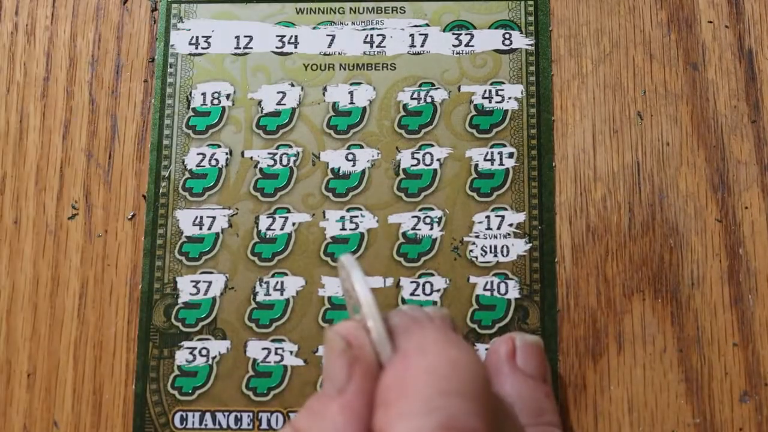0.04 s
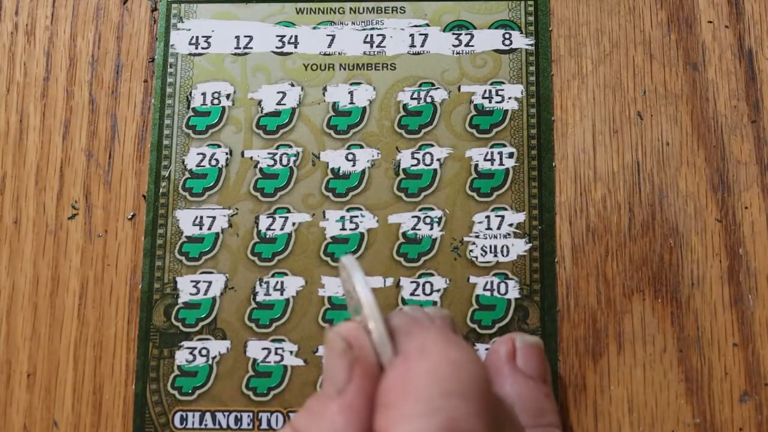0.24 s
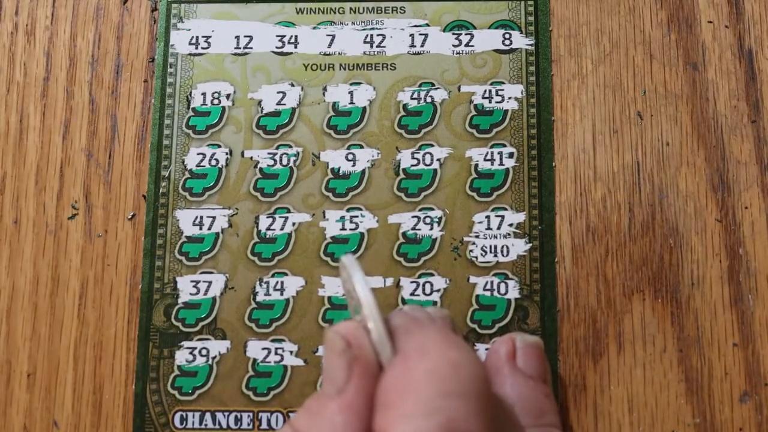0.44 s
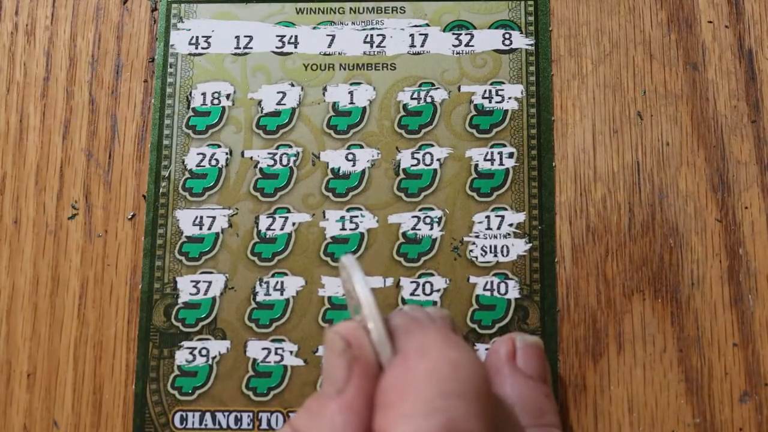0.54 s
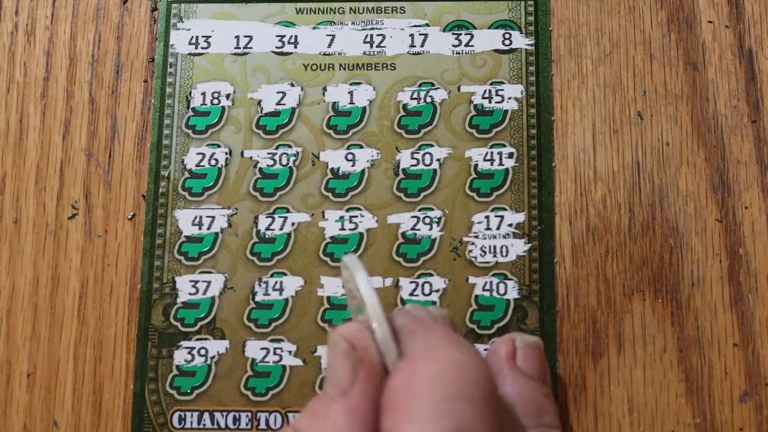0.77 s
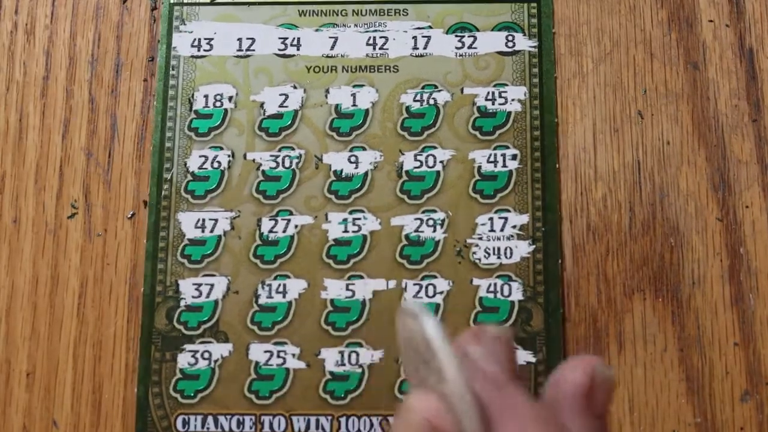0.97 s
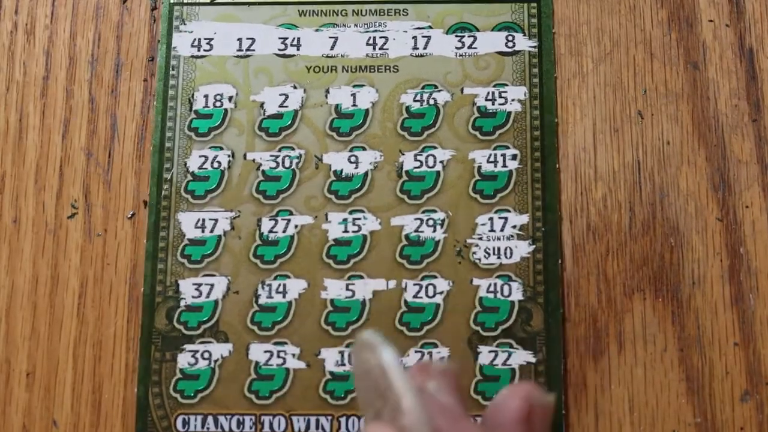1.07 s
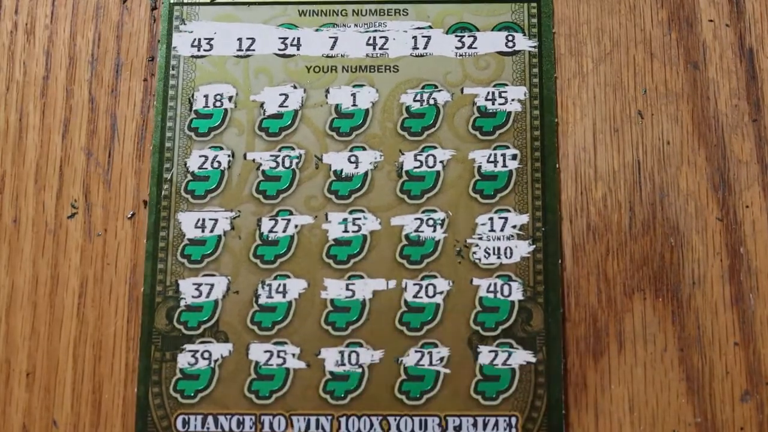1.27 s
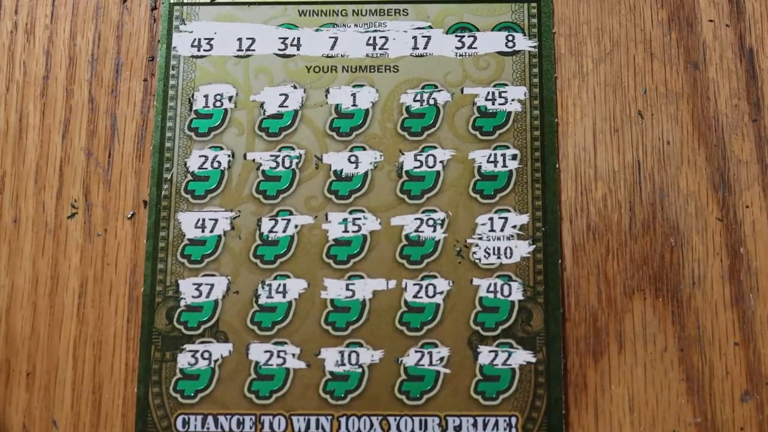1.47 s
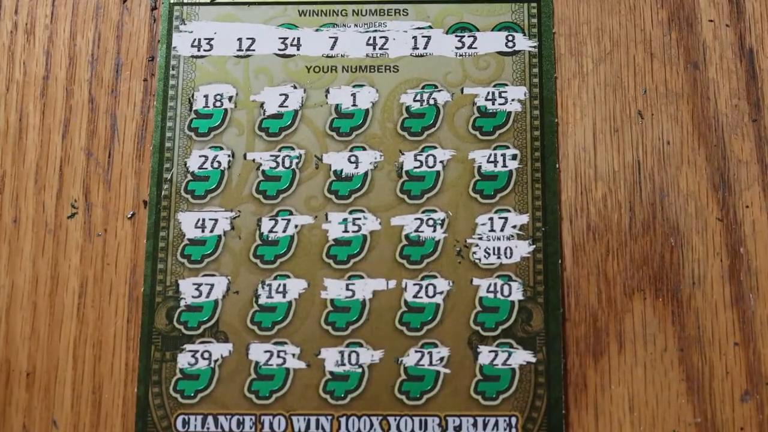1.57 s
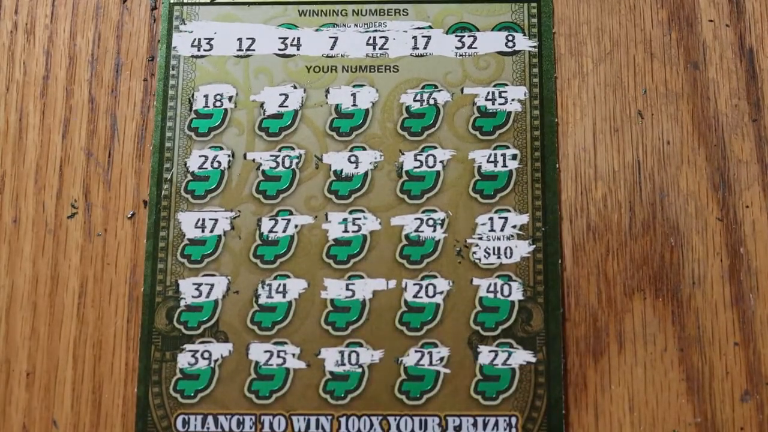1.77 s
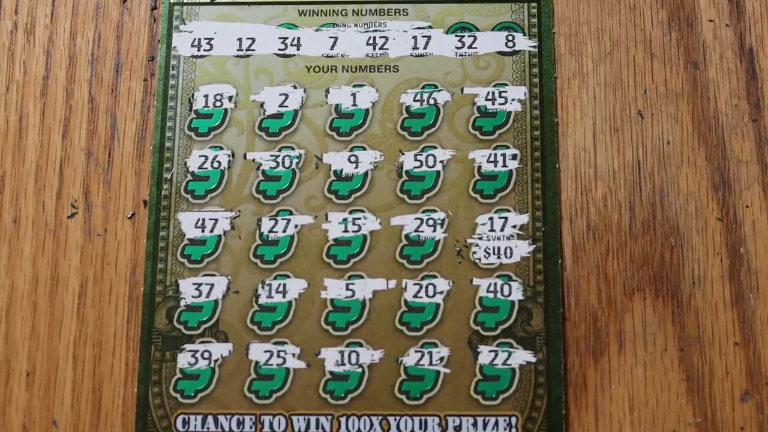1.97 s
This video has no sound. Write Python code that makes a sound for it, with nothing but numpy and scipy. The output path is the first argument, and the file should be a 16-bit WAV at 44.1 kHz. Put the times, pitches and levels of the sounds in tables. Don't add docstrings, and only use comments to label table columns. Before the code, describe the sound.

A heavy metal coin rings like a small bell, knocks sharply on a wooden table, rings again

```python
import sys
import numpy as np
from scipy import signal
from scipy.fft import rfft, irfft, next_fast_len
from scipy.io import wavfile
from scipy.ndimage import uniform_filter1d, map_coordinates

SR = 44100
rng = np.random.default_rng(int(sys.argv[2]) if len(sys.argv) > 2 else 0)


def level_to_linear(level):
    exponent = np.asarray(level, float) / 20
    return 10 ** exponent


def waveform_to_disk(signal):
    frames = np.transpose(np.atleast_2d(signal))
    scaled = np.clip(frames, -1, 1) * 32767
    samples = np.round(scaled).astype(np.int16)
    wavfile.write(sys.argv[1], SR, samples)


N = 88685


def unit(x):
    return x / np.sqrt(np.mean(x ** 2) + 1e-20)


def along(points, hz):
    f, v = np.transpose(points)
    return np.interp(np.log(hz + 1), np.log(f + 1), v)


def over_time(points):
    return np.interp(np.arange(N) / SR, *np.transpose(points))


def wobble(rate):
    knots = rng.standard_normal(int(N * rate / SR) + 4)
    return map_coordinates(knots, [np.arange(N) * rate / SR])


def filtered(x, response):
    m = next_fast_len(N + SR // 2)
    return irfft(rfft(x, m) * response(np.fft.rfftfreq(m, 1 / SR)), m)[..., :N]


def highpass(hz, power):
    return lambda f: 1 / (1 + (hz / (f + 1)) ** power)


def bursts(rows, colour):
    t = np.arange(N) / SR
    noise = unit(filtered(rng.standard_normal(N), colour))
    return noise * sum((t >= s) * level_to_linear(db - 60 * np.abs(t - s) / t60) for s, db, t60 in rows)


def tone(t, hz, fade_db, left_db, right_db, lead, turn):
    level_db = np.array([[left_db], [right_db]]) - fade_db * t
    phase = 2 * np.pi * hz * t + turn - lead * np.array([[0], [1]])
    return level_to_linear(level_db) * np.cos(phase)


# (time [s], level [dB])
TURN = [(0, 3), (.6, 0.5), (0.732, 3), (.765, -1), (.8, 1), (.87, 1), (1.001, 4), (1.04, -0.5), (1.101, -2),
        (1.138, -1.5), (1.19, 3.5), (1.246, 3), (1.319, 7), (1.355, 4.5), (1.39, 10.5), (1.446, -1.5),
        (1.52, 7.5), (2.01, -3)]
TURN_RIGHT = 0.23
# (time [s], second mode left [dB], second mode right [dB], third mode [dB],
# fourth mode right [dB])
TILT = [(0.0, 0.5, 2.5, 4.5, 3), (0.1, -0.5, 2.0, -0.5, -1), (0.25, -0.5, -0.5, 0.4, 1.5),
        (0.451, -1.0, -2.0, 0, 0.5), (0.56, -0.5, -2, 2.5, -0.5), (0.66, -0.5, 3, 1, 2),
        (0.78, -2, -1, -0.5, 1.5), (0.9, 2, -1, 1.5, 0.5), (1.039, -2.5, 2.5, -2, -0.5), (1.14, 0, 0, 2, 2),
        (1.27, -1, -0.5, 0.5, 1.0), (1.36, 2.0, 5, 1.5, 0.0), (1.45, -2.0, -3, 4, -6.5),
        (1.56, -2, 0.5, 3, 0.0), (1.659, 1.5, -1, 4.5, -1), (1.77, 3.0, 2.5, -0.5, -2.0),
        (1.899, -0.5, -3.5, 3.7, 1.5), (2.0, 1.5, -7.5, 3, -1)]


def lobes():
    t = np.arange(N) / SR
    s, *columns = np.transpose(TILT)
    left, right, third, fourth_right = [np.interp(t, s, c) for c in columns]
    out = np.zeros((len(TWINS), 2, N))
    out[1] = [left, right]
    out[2] = third
    out[3] = over_time(TURN) * np.array([[1], [TURN_RIGHT]]) + [0 * t, fourth_right]
    return out


STRIKE_S = [
    0,
    .572,
]
# (low twin [Hz], split [Hz], low twin fade [dB/s], high twin fade [dB/s])
TWINS = [(913.38, 2.03, 5.5, 7.8), (2403.66, 2.96, 8, 11.6), (4442.73, 3.68, 17.6, 20.5),
         (6982.68, 1.66, 38, 26.5), (9977.35, 6.4, 98, 96), (13396.36, 5.68, 169, 163)]
RING_DB = [.5, 3.5, 4, 3.5, 5.5, 5.5]
SWELL_S = [
    [.1215, .282, .177, .194, .144, .0165],
    [.339, .0065, .144, .121, .088, .096],
]
# (left [dB], right [dB], left leads [rad])
FIRST_STRIKE = [(-44, -43, 2.81), (-46, -38, 1.38), (-19, -24.4, -.84), (-26.5, -39, -1.73),
                (-30, -34, 2.73), (-12.2, -14.3, 2.4), (-17, -14, 1.74), (-30, -31.4, 1.02),
                (-16.4, -14, 2.83), (-6.4, -7, 2.92), (-21, -25, 3.12), (-15, -12, -2.85)]
# (left [dB], right [dB], left leads [rad])
SECOND_STRIKE = [(-44.6, -38.6, -2.31), (-40.5, -35.3, .17), (-25.3, -29, .85), (-29, -36, -.73),
                 (-24.4, -28.4, 2.56), (-17.8, -20.2, 2.48), (-12.4, -13.5, 1.6), (-30, -29.4, 1.08),
                 (-11.5, -9, 2.82), (4.3, 2.8, 2.9), (-19.7, -17.6, -2.42), (-4.4, -2.6, -2.86)]
SINGLE_HZ = [1826.9, 3317.2, 3420, 9386.5, 3003, 6562, 7278, 8398, 3800, 5360, 6069, 7896, 8420, 11428,
             5560, 1180, 8065]
# (fade [dB/s], first strike [dB], second strike [dB], left minus right [dB])
SINGLES = [(11, -48, -49, 6.5), (17, -43, -49, 7), (330, -20, 4.5, -4), (130, -29, -46, 3),
           (240, -25, -8, -3), (300, -35, -10, 0), (1200, -30, -8, 0), (700, -20, -3, 0),
           (1200, -35, -4, 0), (15, -68, -66, 0), (25, -58, -60, 0), (30, -58, -66, 0), (20, -64, -60, 0),
           (35, -60, -72, 3), (260, -40, -22, 0), (1300, -40, -3, 2), (500, -30, -16, 0)]
# (frequency [Hz], left leads [rad])
SINGLE_LEADS = [(1200, .8), (1800, 1.36), (3000, 2.6), (3317.2, -1.45), (3420, 2.1), (6500, 2.2),
                (9400, 4.5)]
FLUTTER_DB, FLUTTER_HZ = 7, 5000
RISE_S = .002


def disc():
    out = np.zeros((2, N))
    edges = [round(s * SR) for s in STRIKE_S] + [N]
    lobes_db = lobes()
    for k, rows in enumerate([FIRST_STRIKE, SECOND_STRIKE]):
        a, b = edges[k:k + 2]
        t = np.arange(b - a) / SR
        for m, (hz, split, low_fade, high_fade) in enumerate(TWINS):
            turn = rng.uniform(0, 2 * np.pi)
            high_turn = turn - 2 * np.pi * split * SWELL_S[k][m]
            low = tone(t, hz, low_fade, *rows[2 * m], turn)
            high = tone(t, hz + split, high_fade, *rows[2 * m + 1], high_turn)
            out[:, a:b] += level_to_linear(RING_DB[m] + lobes_db[m, :, a:b]) * (low + high)
        for hz, (fade, *strike_db, pan) in zip(SINGLE_HZ, SINGLES):
            depth = np.minimum(1, 100 / fade) * (1 if hz > FLUTTER_HZ else .3)
            flutter_db = FLUTTER_DB * depth * wobble(25)[a:b]
            left_db, right_db = strike_db[k] + pan / 2, strike_db[k] - pan / 2
            lead, turn = along(SINGLE_LEADS, hz), rng.uniform(0, 2 * np.pi)
            out[:, a:b] += level_to_linear(flutter_db) * tone(t, hz, fade, left_db, right_db, lead, turn)
        out[:, a:b] *= 1 - k * np.exp(-t / RISE_S)
    return out


def graze():
    start_s, hz, level_db, t60_s = .5605, 11400, -25, .04
    t = np.maximum(np.arange(N) / SR - start_s, 0)
    sine = level_to_linear(level_db - 60 * t / t60_s) * np.sin(2 * np.pi * hz * t)
    return sine * np.array([[1], [-1]])


# (frequency [Hz], width [Hz], level [dB])
WOOD = [(97, 35, 0.5), (202, 130, -8), (345, 130, 2), (490, 130, 3), (720, 260, 1.5), (1073, 390, 1),
        (2480, 180, -19)]


def wood(f):
    total = 0
    for k, (centre, width, db) in enumerate(WOOD):
        damping = 1j * f * width
        total = total + (-1) ** k * level_to_linear(db) * damping / (centre ** 2 - f ** 2 + damping)
    return total


# (time [s], level [dB], t60 [s])
BLOWS = [
    (.5605, -28.5, 0.04),
    (.567, -17.5, 0.093),
    (.5722, -6.5, 0.0043),
]
# (frequency [Hz], level [dB per Hz])
BLOW = [(30, -41), (70, -25.5), (200, -14), (400, -9), (1800, -12.5), (3400, -10.5), (5600, -16.5),
        (13500, -18.5), (16000, -44.5)]
# (time [s], level [dB], t60 [s])
AFTER = [
    (.5735, 0, 0.065),
    (-0.0037, -17, 0.074),
]
AFTER_HZ = 5300
PUSH_S = .5724
THUMP_DB = 22.5


def knock():
    push = np.zeros(N)
    push[round(PUSH_S * SR)] = level_to_linear(THUMP_DB)
    bright = lambda f: level_to_linear(along(BLOW, f))
    dull = lambda f: bright(f) / (1 + (f / AFTER_HZ) ** 4)
    return bursts(BLOWS, bright) + bursts(AFTER, dull) + filtered(push, wood)


# (time [s], level [dB], t60 [s])
CRACK = [
    (.5718, -2, .005),
    (.5675, -22, .03),
]


def landing():
    push_db, length_s, push_hz, crack_hz = 2, .00025, 80, 7500
    u = np.maximum(np.arange(N) / SR - PUSH_S, 0) / length_s
    pulse = level_to_linear(push_db) * np.e * u * np.exp(-u)
    push = filtered(pulse, lambda f: (1j * f / (push_hz + 1j * f)) ** 2)
    return push + bursts(CRACK, highpass(crack_hz, 4))


# (time [s], level [dB], t60 [s])
HUM = [
    (-.01, -39, .45),
    (.576, -33, .4),
]


def table_hum():
    centre_hz, width_hz = 145, 170
    return bursts(HUM, lambda f: 1 / (1 + ((f - centre_hz) / width_hz * 2) ** 4))


# (time [s], level [dB])
BUMPS = [
    (0.867, -6),
    (.89, -13),
    (.925, -14),
    (1.665, -5),
    (1.676, -11),
    (1.713, -20),
    (1.975, -12),
    (2.005, 3.5),
]


def fingers():
    soft_hz = 990
    push = np.zeros(N)
    for s, db in BUMPS:
        push[round(s * SR)] = level_to_linear(db)
    return filtered(push, lambda f: wood(f) / (1 + 1j * f / soft_hz) ** 2)


# (frequency [Hz], left minus right [dB])
PORT_PAN = [(80, 0), (190, -9), (300, -3), (500, -4), (800, 4), (1500, 1.5), (3000, 0)]
# (frequency [Hz], left leads [rad])
PORT_LEAD = [(110, 0), (200, .9), (300, 1.6), (800, 1.3), (1300, .8), (2000, 2.2), (10000, 2.9)]


def ports(x):
    side = np.array([[1], [-1]]) / 2
    return filtered(x, lambda f: level_to_linear(side * along(PORT_PAN, f)) * np.exp(1j * side * along(PORT_LEAD, f)))


# (frequency [Hz], t60 [s])
WALLS = [(200, .3), (2000, 0.33), (6000, 0.24), (10000, 0.017)]


def walls(x):
    _, t, z = signal.stft(rng.standard_normal((2, SR // 2)), SR, nperseg=256)
    decay = level_to_linear(-60 * t / along(WALLS, np.fft.rfftfreq(256, 1 / SR))[:, None])
    tail = signal.istft(z * decay, SR, nperseg=256)[1]
    tail = tail / np.linalg.norm(tail[0])
    late = np.pad(x, (200, 0))[None]
    return signal.fftconvolve(late, tail, axes=1)[:, :N]


def ticking():
    phase_s, every_s, level_db, centre_hz, t60_s = 1.0385, .1, -44, 13100, .04
    t = (np.arange(N) / SR - phase_s) % every_s
    colour = lambda f: 0.7 * (f > 5200) + 1 / (1 + ((f - centre_hz) / 900) ** 2)
    noise = unit(filtered(rng.standard_normal(N), colour))
    return level_to_linear(level_db - 60 * t / t60_s) * noise * np.array([[1], [-.6]])


# (frequency [Hz], correlation [-1 to 1])
ROOM_ALIKE = [(70, 0.97), (200, -0.053), (1000, -0.18), (8000, -0.53)]


def hiss(spectrum, db):
    patchy_db = 3
    z = signal.stft(rng.standard_normal((2, N)), nperseg=512)[2]
    field = uniform_filter1d(rng.standard_normal(z.shape[1:]), 6, 0)
    field = uniform_filter1d(field, 14, 1)
    pair = signal.istft(z * level_to_linear(patchy_db * unit(field)), nperseg=512)[1][:, :N]

    def mid_side(f):
        turn = np.arccos(np.clip(along(ROOM_ALIKE, f), -1, 1)) / 2
        return level_to_linear(along(spectrum, f)) * np.array([np.cos(turn), np.sin(turn)])

    mid, side = filtered(pair, mid_side)
    return level_to_linear(db) * unit(np.array([mid + side, mid - side]))


# (frequency [Hz], level [dB per Hz])
ROOM = [(60, -16.5), (200, -11.5), (500, -13), (1200, -12), (3000, -20), (4600, -21), (6000, -31),
        (11000, -21), (15500, -41.5)]
# (frequency [Hz], level [dB per Hz])
RUMBLE = [(20, -14.5), (55, 5.5), (85, -2), (130, -24), (300, -52)]
# (time [s], level [dB])
OPENING = [(0, -25), (1, -19), (1.299, -10.5), (1.649, -10.5), (1.8, -6.5), (2.01, -9.5)]


def room():
    air = ticking() + hiss(ROOM, -56)
    treble = filtered(air, highpass(4570, 8))
    return air + treble * (level_to_linear(over_time(OPENING)) - 1) + hiss(RUMBLE, -69)


def scene():
    hits = knock() + fingers()
    answer = level_to_linear(-16.5) * walls(filtered(hits, highpass(200, 4)))
    close = disc() + graze() + table_hum() + ports(hits + landing())
    return close + answer + room()


def band_limit(f):
    return 1 / (1 + (f / 15700) ** 40)


# (time [s], level [dB])
GAIN = [(0, -18.5), (.05, -10), (.1, -3.8), (.2, -1.9), (.35, .1), (.56, .2), (.6, -17.6), (.65, -14.3),
        (.7, -9.1), (.75, -5.5), (.8, -1), (.9, -1.3), (1.1, -.6), (1.4, .2), (1.7, 4.8), (2, 5.4)]
DUCK_S, DUCK_DB = .5737, -16.5


def automatic_gain():
    s, db = np.transpose(GAIN)
    t = np.arange(N) / SR
    late = s > DUCK_S
    before = np.interp(t, s[~late], db[~late])
    after = np.interp(t, np.r_[DUCK_S, s[late]], np.r_[DUCK_DB, db[late]])
    return uniform_filter1d(np.where(t < DUCK_S, before, after), size=60)


def roll_off(x):
    return signal.sosfilt(signal.butter(12, 20000, fs=SR, output="sos"), x)


def record(dry):
    x = dry * level_to_linear(automatic_gain())
    mix = filtered(np.clip(x, -1, 1), band_limit)
    return roll_off(mix)


dry = scene()
out = record(dry)
waveform_to_disk(out)
```